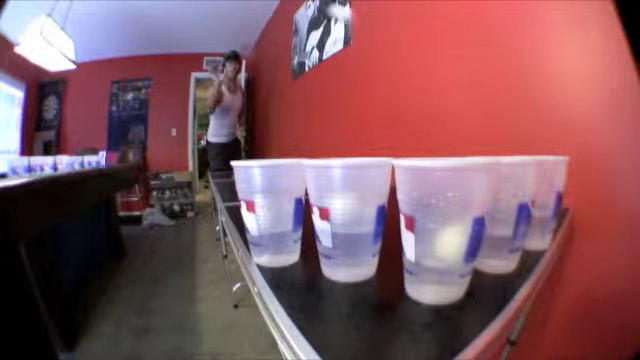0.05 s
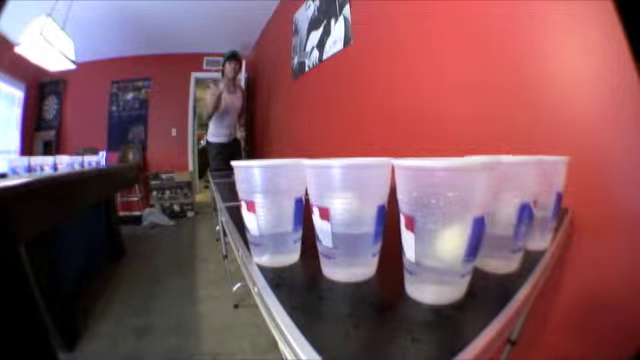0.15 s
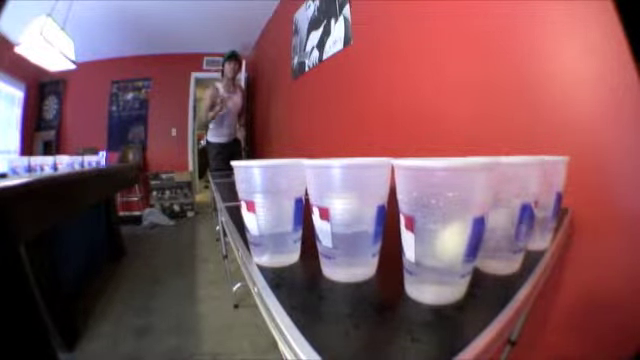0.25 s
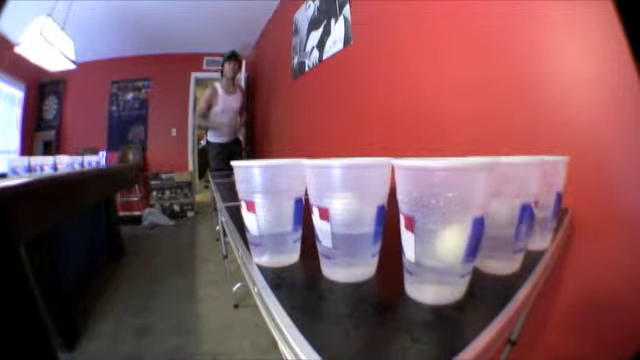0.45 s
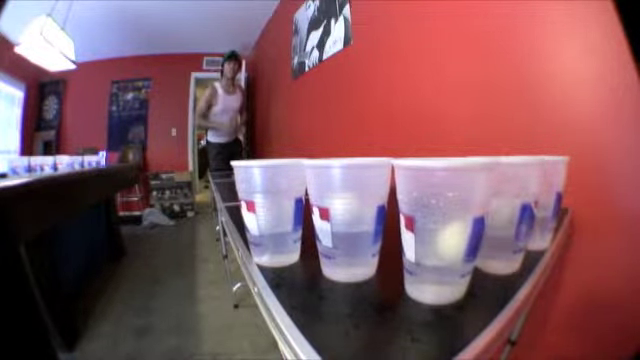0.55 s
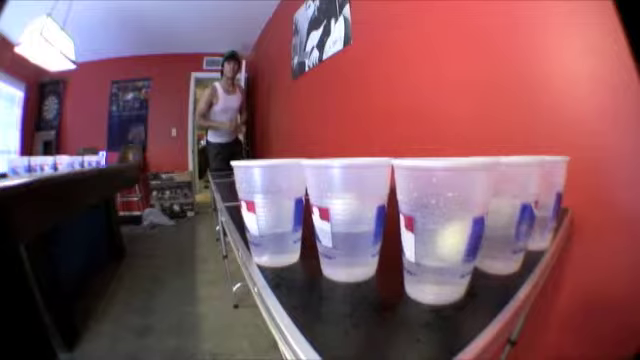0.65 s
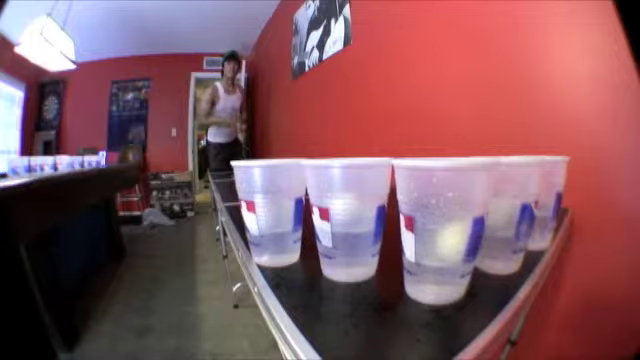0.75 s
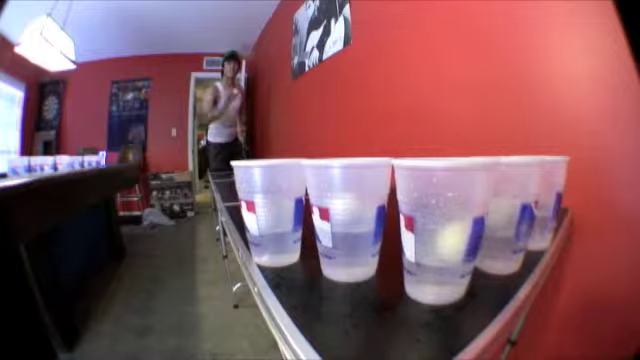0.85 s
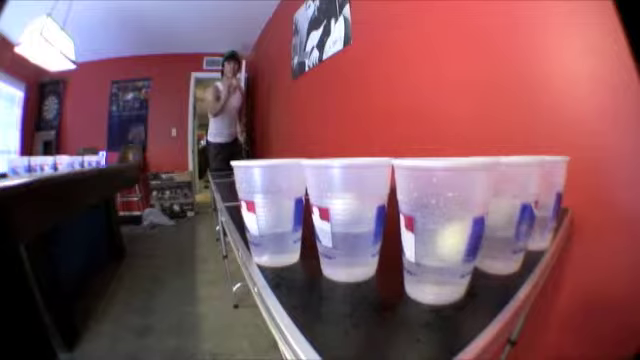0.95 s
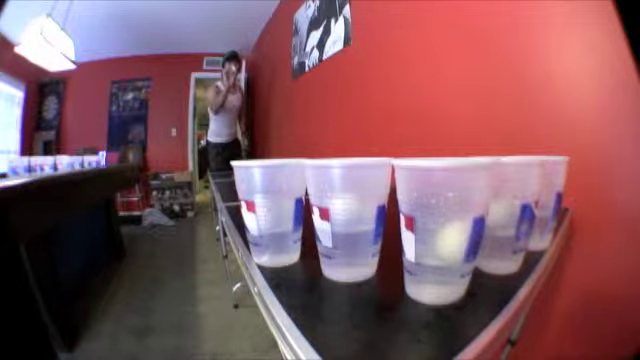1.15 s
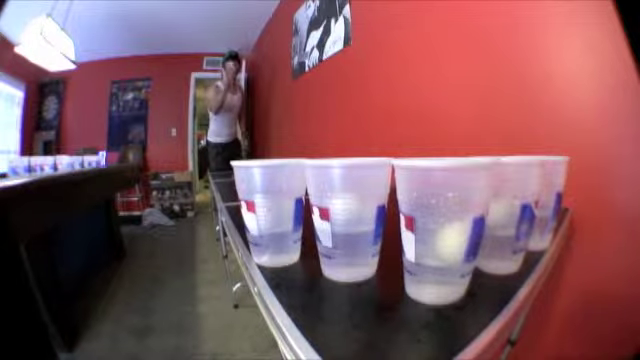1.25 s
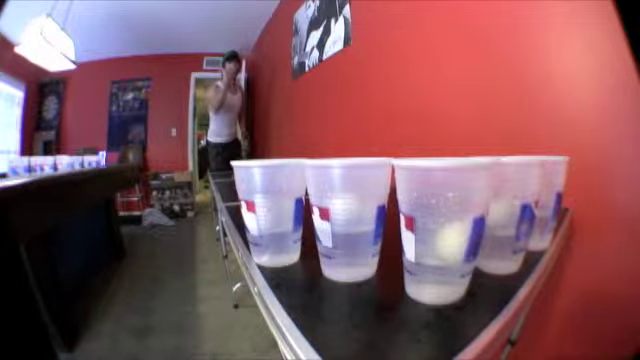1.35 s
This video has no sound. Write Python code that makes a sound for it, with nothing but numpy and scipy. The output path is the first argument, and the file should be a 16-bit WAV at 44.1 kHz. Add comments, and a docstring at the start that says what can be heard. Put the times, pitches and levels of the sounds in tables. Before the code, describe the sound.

A table-tennis ball smacks into a plastic cup and rattles briefly in a small room.

```python
"""A sharp, close smack: a table-tennis ball lands in a thin plastic cup and rattles round inside it.
The cup wall cracks and rings, and a small hard room answers with reflections and a slow, low boom.
A few faint, hollow knocks follow over a low hum, hiss and a thin whine. The blow overloads the
recorder, which clips, drops its gain and creeps back."""
import sys
import numpy as np
from scipy import signal
from scipy.fft import rfft, irfft
from scipy.io import wavfile

SR = 44100
rng = np.random.default_rng(int(sys.argv[2]) if len(sys.argv) > 2 else 0)


def pcm_store(signal):
    """Save signal as 16-bit PCM."""
    levels = np.round(np.clip(np.atleast_2d(signal), -1, 1) * 32767)
    wavfile.write(sys.argv[1], SR, levels.astype(np.int16).T)


N = 61739

# Tone of the cup wall's crack. Each row: frequency in Hz, relative level in dB.
CRACK_SPECTRUM = [(60, -12.5), (200, -10.5), (420, -6), (700, -8), (1000, -3), (1250, -15.5), (1700, -2),
                  (2700, -3.5), (3300, -7.5), (4400, -3.5), (6200, -3.5), (8000, -15), (11000, -31),
                  (15500, -37)]
# The ring of cup and ball. Each row: pitch in Hz, relative level in dB, seconds to fade by 60 dB.
CUP_MODES = [(436, -20, 0.042), (873, -16, 0.14), (947, -8.5, .11), (978.3, -1, .05), (1023, -5, 0.11),
             (1502, -9, 0.046), (1880, -13, .05), (2314, -14.5, 0.09), (2756, -10.5, 0.11),
             (3173, -5.5, .06), (3800, -10, 0.096), (3880, -13, .07), (4340, -5, 0.045),
             (5244, -13.5, 0.12), (5890, -14.5, .05)]
# The room's low boom. Each row: pitch in Hz, relative level in dB, seconds to fade by 60 dB.
ROOM_MODES = [(149.5, -26, 0.85), (224, -36.5, 0.96), (246, -34.5, .6), (295, -38, .45)]
# The ball's taps in the cup. Each row: start in seconds, gain in dB, trim on the tick in dB.
RATTLE_TAPS = [(.2675, -7.5, -6), (0.2766, -11.5, -4), (0.279, -11, -4), (0.2857, -14, -4.5),
               (0.2921, -10, -14), (.3055, -19, -12), (.3665, -28, 9), (.3765, -21.5, -0.5),
               (.386, -17.5, -1.5), (.390, -16, -5.5), (.394, -17.5, 2), (.398, -18.5, -26.5),
               (.403, -23, 3), (.412, -25, 8.5), (.422, -23.5, 7), (.430, -21.5, -2), (.434, -27.5, 1),
               (.4385, -23, -2), (.448, -26.5, 1.5), (.4665, -35.5, 16.5), (.474, -28.5, 5),
               (.497, -35.5, 3), (.517, -27, 1), (.526, -28, -4), (.554, -42, -17), (.5925, -42.5, 2)]
# Tone of a tap's hollow body. Each row: frequency in Hz, relative level in dB.
TAP_SPECTRUM = [(40, -41.5), (90, -23.5), (200, -3.5), (400, -2), (700, -5), (1200, -6), (1600, 5.5),
                (2000, 0.5), (2600, -2), (4000, -1.5), (6200, -8.5), (7400, -15), (10000, -31.5),
                (15500, -45.5)]
# Tone of a tap's bright contact tick. Each row: frequency in Hz, relative level in dB.
TICK_SPECTRUM = [(100, -25.5), (2000, 2.5), (6000, 5), (7400, 3), (8300, 3.5), (10000, -6.5),
                 (11500, -10.5), (15500, -22)]
# Knocks farther off. Each row: start in seconds, gain in dB, brightness in dB per octave.
FAR_KNOCKS = [(.742, -48.5, -4), (.775, -52.5, 2), (.858, -56.5, -2.5), (1.0207, -50, -0.5),
              (1.075, -56.5, 0.5), (1.111, -44.5, -0.5), (1.116, -44, -1.5), (1.141, -53, -3)]
# Tone of a knock's attack. Each row: frequency in Hz, relative level in dB.
KNOCK_SPECTRUM = [(50, -15), (300, 0), (700, -5.5), (1050, 3), (1800, -7.5), (2300, -1.5), (3300, -3),
                  (4500, -0.5), (5800, -9), (8000, -34), (15500, -28)]
# A knock's ring. Each row: pitch in Hz, relative level in dB, seconds to fade by 60 dB.
KNOCK_RING = [(1010, -29, .07), (1065.4, -6.5, 0.063), (1408, -15.5, 0.097), (1508, -9, 0.12),
              (2278, -6, 0.057), (2798, -7.5, .05), (3840, -7.5, .04)]
# Length of the room's tail. Each row: frequency in Hz, seconds to fade by 60 dB.
ROOM_DECAY = [(100, 2.06), (250, 0.3652), (1000, 0.5752), (2500, 0.34), (6000, 0.4569), (9000, 0.27),
              (12000, 0.83), (15500, 1.33)]
# Tone of the room's tail. Each row: frequency in Hz, relative level in dB.
ROOM_SPECTRUM = [(50, -30.5), (90, -14), (150, 0.5), (400, 1), (700, 5), (1000, 5.5), (2000, 3.5),
                 (4000, -0.5), (6000, -4.5), (9000, -3), (12000, -7), (15500, -14)]
# The bed of rumble and hiss. Each row: frequency in Hz, relative level in dB.
BED_SPECTRUM = [(12, -11.5), (28, -0.5), (45, -9.5), (80, -9), (120, -9), (150, -3.5), (190, -8),
                (250, -11), (330, -11.5), (420, -16.5), (600, -17.5), (1000, -21), (2300, -25.5),
                (4500, -26.5), (5600, -29.5), (15800, -32.5)]
# How alike the bed is left and right. Each row: frequency in Hz, likeness from 0 to 1.
BED_LIKENESS = [(60, 1), (180, .96), (550, 1), (1650, .55), (4970, .5), (15000, 0)]
# Hum and whine. Each row: pitch in Hz, level in dB.
HUM_TONES = [(31.5, -58), (150.6, -58), (3149, -72.5), (3898, -75.5), (4048, -75.5), (4194, -78.5),
             (4495, -72), (4797, -78)]
# Width from the channels' phase mismatch. Each row: frequency in Hz, side against middle in dB.
STEREO_WIDTH = [(100, -28), (1000, -18), (2500, -13.5), (5000, -16.5), (9000, -7), (12000, -14),
                (15000, -12)]


def smack(start_s=.245, crack_rise_s=.002, push_s=.0005, boom_rise_s=.16):
    """The ball lands: air is pushed, the cup cracks and rings, the room's low resonance swells slowly."""
    t, near, boom = np.arange(SR) / SR, np.zeros(N), np.zeros(N)
    crack = amp(10.5) * colour(crackle(t, t60=.03), CRACK_SPECTRUM) * np.minimum(t / crack_rise_s, 1)
    push = amp(4) * (1 - t / push_s) * np.exp(-t / push_s)
    add(near, start_s, crack - push + amp(-2) * ring(CUP_MODES, t))
    swell = 1 - np.exp(-(t / boom_rise_s) ** 2)
    add(boom, start_s, amp(4) * ring(ROOM_MODES, t) * swell)
    return near + boom + amp(-12.5) * room(near)


def rattle(rise_s=.0012, tick_db=-9):
    """The ball taps the cup wall again and again as it settles: a bright tick, then the hollow body."""
    t, near = np.arange(SR // 4) / SR, np.zeros(N)
    for start_s, gain_db, trim_db in RATTLE_TAPS:
        body = colour(crackle(t, t60=.031), TAP_SPECTRUM) + amp(-19) * ring(CUP_MODES, t)
        body *= np.minimum(t / rise_s, 1)
        tick = amp(tick_db + trim_db) * colour(crackle(t, t60=.014), TICK_SPECTRUM)
        add(near, start_s, amp(gain_db) * (body + tick))
    return near + amp(-11.5) * room(near)


def knocks(rise_s=.00052):
    """Faint, hollow knocks, set back by a little more room."""
    t, far = np.arange(SR // 4) / SR, np.zeros(N)
    for start_s, gain_db, tilt_db in FAR_KNOCKS:
        knock = colour(crackle(t, t60=.051), KNOCK_SPECTRUM, tilt_db) + ring(KNOCK_RING, t)
        add(far, start_s, amp(gain_db) * knock * np.minimum(t / rise_s, 1))
    return far + amp(-10.5) * room(far)


def room(x, predelay_s=.004):
    """Dense reflections off hard walls, each band dying at its own speed."""
    hz, t, bands = signal.stft(rng.standard_normal(SR), SR, nperseg=256)
    decay = np.exp(-np.log(1000) * t / curve(ROOM_DECAY, hz)[:, None])
    tone = amp(curve(ROOM_SPECTRUM, hz))[:, None]
    tail = signal.istft(bands * decay * tone, SR, nperseg=256)[1]
    tail *= np.clip(np.arange(len(tail)) / SR / predelay_s - 1, 0, 1)  # a gap, then a quick fade-in
    return signal.fftconvolve(x, tail / np.linalg.norm(tail))[:N]


def room_tone(level_db=-53.5):
    """A bed of noise: rumble in the centre, hiss spread wide."""
    hz = np.fft.rfftfreq(N, 1 / SR)
    left, unrelated = rfft(rng.standard_normal((2, N)))
    likeness = np.clip(curve(BED_LIKENESS, hz), 0, 1)
    right = likeness * left + np.sqrt(1 - likeness ** 2) * unrelated
    bed = irfft(np.array([left, right]) * amp(curve(BED_SPECTRUM, hz)), N)
    return amp(level_db) * unit(bed)


def hum(waver=.11, waver_hz=18):
    """A low hum and a thin whine, each tone wavering in level and phase."""
    t, tones = np.arange(N) / SR, np.zeros(N)
    lowpass = np.exp(-(np.fft.rfftfreq(N, 1 / SR) / waver_hz) ** 2)
    for hz, db in HUM_TONES:
        swell, drift = unit(irfft(rfft(rng.standard_normal((2, N))) * lowpass, N))
        tones += amp(db) * np.sqrt(2) * (1 + waver * swell) * np.sin(2 * np.pi * hz * t + waver * drift)
    return tones


def crackle(t, t60):
    """A dying burst of tiny snaps, 60 dB down after t60 seconds."""
    return rng.choice([-1., 1.], len(t)) * np.exp(-np.log(1000) * t / t60)


def ring(modes, t):
    """Resonant modes: dying sines, each starting in a random phase."""
    return sum(amp(db - 60 * t / t60) * np.sin(2 * np.pi * (hz * t + rng.random()))
               for hz, db, t60 in modes)


def colour(x, spectrum, tilt_db=0, size=2048):
    """A unit-power EQ, tilted by tilt_db per octave above 200 Hz; minimum phase keeps attacks sharp."""
    hz = abs(np.fft.fftfreq(size, 1 / SR))
    gain = unit(amp(curve(spectrum, hz) + tilt_db * np.log2(np.maximum(hz, 200))))
    response = np.exp(np.conj(signal.hilbert(np.log(gain))))
    return signal.fftconvolve(x, np.fft.ifft(response).real)[:len(x)]


def amp(db):
    """Decibels to gain."""
    return 10 ** (np.asarray(db) / 20)


def unit(x):
    """Scales to rms 1."""
    return x / np.sqrt(np.mean(x ** 2) + 1e-20)


def curve(points, hz):
    """Reads between points on a log-frequency axis."""
    point_hz, value = np.transpose(points)
    return np.interp(np.log(hz + 1), np.log(point_hz + 1), value)


def add(mix, start_s, sound):
    """Mixes a sound in at its start time."""
    part = mix[round(start_s * SR):][:len(sound)]
    part += sound[:len(part)]


def auto_gain(x, threshold_db=-12, max_duck_db=10, attack_s=.0078, recover_db_per_s=48):
    """The recorder's gain ducks a moment after a loud sound, then creeps back."""
    power = signal.lfilter(np.ones(64) / 64, 1, (x ** 2).mean(0))
    over_db = np.clip(10 * np.log10(power + 1e-12) - threshold_db, 0, max_duck_db)
    recovery_db = np.arange(N) / SR * recover_db_per_s
    held_db = np.maximum.accumulate(over_db + recovery_db) - recovery_db
    pole = np.exp(-1 / (attack_s * SR))
    duck_db = signal.lfilter([1 - pole], [1, -pole], held_db)
    return x * amp(-duck_db)


def channel_mismatch(x, balance_db=-.46):
    """Left and right differ slightly in phase and level, which widens the image."""
    phase = np.arctan(amp(curve(STEREO_WIDTH, np.fft.rfftfreq(N, 1 / SR))))
    widened = irfft(rfft(x) * np.exp(1j * np.array([phase, -phase])), N)
    return widened * amp([[balance_db / 2], [-balance_db / 2]])


def scene():
    """Smack, rattle and knocks over room tone and hum."""
    return smack() + rattle() + knocks() + room_tone() + hum()


def record(dry, ceiling=.68, cutoff_hz=15900):
    """The gain ducks too late to stop the smack clipping; the image widens and the very top is cut."""
    clipped = np.clip(auto_gain(dry), -ceiling, ceiling)
    lowpass = signal.firwin(401, cutoff_hz, window=("kaiser", 8), fs=SR)
    return signal.oaconvolve(channel_mismatch(clipped), lowpass[None], "same")


dry = scene()
out = record(dry)
pcm_store(out)
```